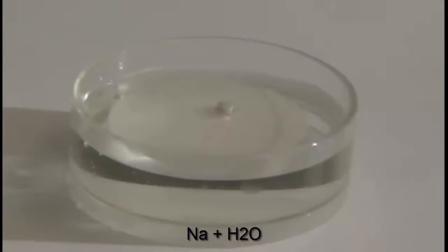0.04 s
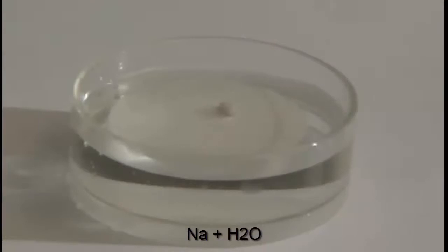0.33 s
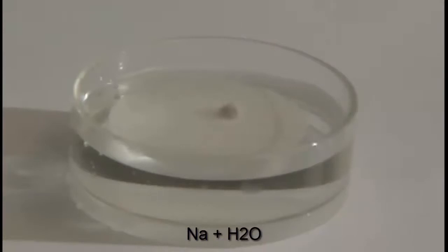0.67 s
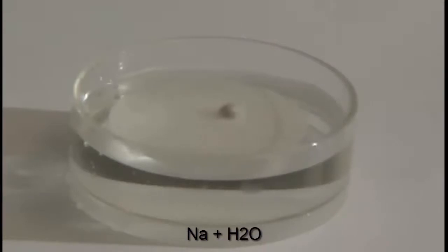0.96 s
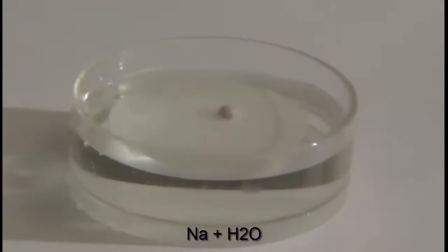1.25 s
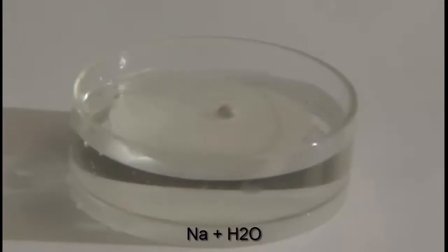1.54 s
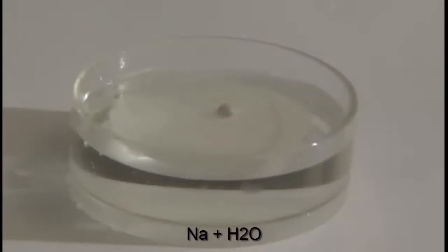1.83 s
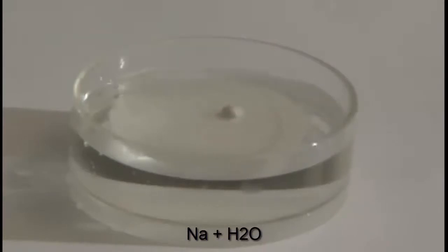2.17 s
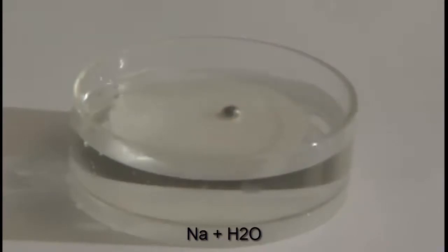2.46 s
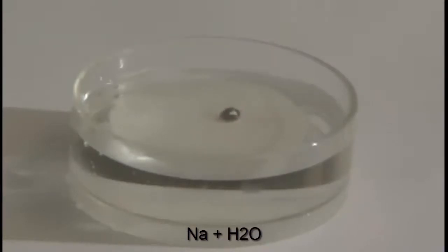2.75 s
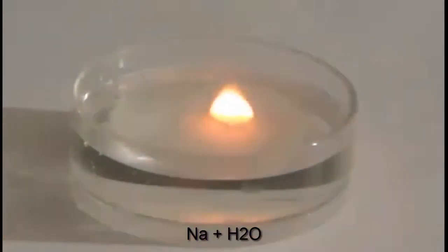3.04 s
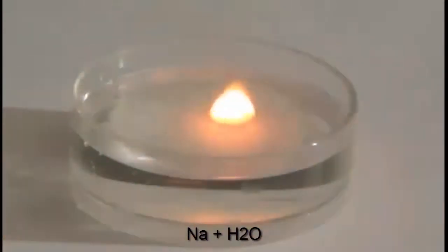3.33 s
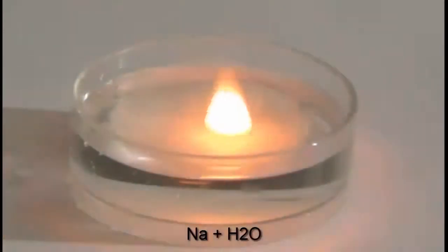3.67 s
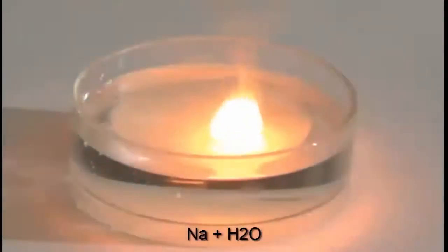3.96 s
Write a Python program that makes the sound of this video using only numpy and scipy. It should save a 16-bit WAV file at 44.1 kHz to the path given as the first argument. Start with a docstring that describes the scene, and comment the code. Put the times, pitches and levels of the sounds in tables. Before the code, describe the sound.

A bead of sodium fizzes faintly on water over low ventilation noise, with a soft, dull bump at about 0.3 seconds. From about 1.2 seconds the fizz grows into a sputtering, bubbly hiss. At 2.9 seconds it ignites with one sharp pop, far louder than the rest, echoing briefly in a hard-walled room. A quiet sizzle follows and swells from about 3.7 seconds to the end.

```python
"""A bead of sodium fizzes on water in a glass dish as countless tiny hydrogen bubbles burst.
Their impulses merge into shot noise, while larger bubbles ring as damped oscillators. The gas ignites
with one sharp pop, a short pulse that excites the echoes, reverberation and normal modes of a
hard-walled room. The bead then burns with a quieter sizzle that flares up at the end.
Faint ventilation and hum lie underneath, with a few dull bumps near the start."""
import sys
import numpy as np
from scipy import signal
from scipy.fft import rfft, irfft
from scipy.io import wavfile
from scipy.ndimage import uniform_filter1d

SR = 44100
rng = np.random.default_rng(int(sys.argv[2]) if len(sys.argv) > 2 else 0)


def generate_wav(sig):
    """Save sig (samples, or channels by samples) to the path in sys.argv[1] as 16-bit PCM at SR."""
    pcm = np.round(np.clip(np.atleast_2d(sig).T, -1, 1) * 32767).astype(np.int16)
    wavfile.write(sys.argv[1], SR, pcm)


N = 176400
TIME = np.arange(N) / SR
BIN_HZ = np.maximum(np.fft.rfftfreq(N, 1 / SR), 1)
IGNITION_S, REVERB_BUILD_S = 2.9193, 0.0023


def undb(db):
    """Amplitude ratio of a level in decibels."""
    return 10 ** (np.asarray(db) / 20)

def unit(x):
    """Normalisation to rms 1."""
    return x / np.sqrt(np.mean(x ** 2))

def curve(rows, column=1):
    """Linear interpolation of a table column in time."""
    rows = np.array(rows)
    return np.interp(TIME, rows[:, 0], rows[:, column])

def since(start):
    """Seconds elapsed since an onset, zero before it."""
    return np.maximum(TIME - start, 0)

def over_hz(points, hz):
    """Interpolation on a logarithmic frequency axis."""
    points = np.array(points)
    return np.interp(np.log(hz), np.log(points[:, 0]), points[:, 1])

def colour(x, spectrum):
    """Spectral shaping, normalised to rms 1."""
    return unit(irfft(rfft(x) * undb(over_hz(spectrum, BIN_HZ)), N))

def above(x, hz):
    """Zero-phase high-pass filtering."""
    return irfft(rfft(x) / (1 + (hz / BIN_HZ) ** 10), N)

def walk(rate):
    """Moving averages turn white noise into a slow fluctuation of rms 1."""
    width = int(SR / rate)
    return unit(uniform_filter1d(uniform_filter1d(rng.standard_normal(N), width), width))

def decay(t, t60):
    """Exponential decay by 60 dB in t60 seconds."""
    return 1000. ** (-t / t60)

def in_room(x):
    """Convolution with decaying noise adds a diffuse field as strong as the direct sound."""
    response = rng.standard_normal(N) * decay(TIME, t60=0.58) * (1 - np.exp(-TIME / REVERB_BUILD_S))
    diffuse = irfft(rfft(x) * rfft(response), N)
    return unit(unit(x) + unit(diffuse))

def large_bubbles(count=1600, per_s=420, median_hz=2202, spread_db=6.5, size=1200):
    """Damped oscillation: each larger bubble rings briefly at its own pitch as it bursts."""
    out, t = np.zeros(N + size), TIME[:size]
    starts = np.cumsum(rng.exponential(1, count)) / per_s
    for start, (pitch, strength) in zip(starts, rng.standard_normal((count, 2))):
        i, hz = int(start * SR), median_hz * 2 ** (0.258 * pitch)
        if i < N:
            ring = np.sin(2 * np.pi * hz * t) * decay(t, t60=34 / hz)
            out[i:i + size] += undb(spread_db * min(strength, 2)) * ring
    return unit(above(out[:N], hz=500))

def bubble_shower(spectrum, per_s=9000, spread_db=6.5, sputter_db=1.1):
    """Shot noise: bursts of very unequal size merge into a sputtering hiss, and a few of them ring."""
    bursts = rng.random(N) < per_s / SR
    sizes = undb(spread_db * np.minimum(rng.standard_normal(N), 2.6)) * rng.choice([-1, 1], N)
    shower = colour(bursts * sizes, spectrum) + undb(-18.5) * large_bubbles()
    return in_room(shower * undb(sputter_db * walk(rate=55)))

# Relative spectral density of the fizz: f/Hz, level/dB
FIZZ_SPECTRUM = [(40, -62), (110, -40), (250, -19), (450, -8), (650, -9), (900, -4.5), (1250, -4.5),
                 (1600, 0.5), (1950, -3), (2400, -0.5), (3000, -2.5), (3600, -5), (4300, -8), (4600, 0),
                 (5250, -0.5), (5700, -5), (6450, -3.5), (7500, -10.5), (8500, -9.5), (9800, -12.5)]
# Strength of the reaction: t/s, relative fizz level/dB, relative treble level/dB
REACTION = [(0.0, -53.5, -7), (0.34, -56, -5.5), (0.51, -52.5, -4), (0.53, -54, -5), (0.73, -52.5, -5.5),
            (0.85, -57, -2), (0.89, -55, -1.5), (1.21, -44.5, -6.5), (1.72, -40, -7), (2.04, -40.5, -8.5),
            (2.18, -41.5, -7.5), (2.25, -44, -12.5), (2.3, -40.5, -7.5), (2.62, -45, -7), (2.81, -39.5, -8),
            (2.89, -45, -10)]
# Gain of the fizz's lower band: t/s, level/dB
FIZZ_LOW_GAIN = [(.3, 7), (.85, -10), (1.17, -8.5), (1.45, 2.5), (1.75, -3), (2.15, 2.5), (2.6, -4),
                 (2.85, -3)]
# Surge of large ringing bubbles: t/s, level/dB
BUBBLE_SURGE = [(1.1, -64), (1.5, -53.5), (2.05, -46), (2.3, -56), (2.88, -56)]

def fizzing():
    """Amplitude modulation: the shower swells and shifts its balance with the reaction."""
    shower = bubble_shower(FIZZ_SPECTRUM)
    treble = above(shower, hz=6670)
    lows = shower - above(shower, hz=1000)
    shower = shower + treble * (undb(curve(REACTION, column=2) + 11.5) - 1)
    shower = shower + lows * (undb(curve(FIZZ_LOW_GAIN)) - 1)
    surge = in_room(large_bubbles()) * undb(curve(BUBBLE_SURGE))
    return shower * undb(curve(REACTION) + 2.5) + surge

# Relative spectral density of moving air: f/Hz, level/dB
AIR_SPECTRUM = [(30, -39), (70, -32), (150, -23), (300, -10.5), (550, -3), (1000, -0.5), (1450, 1),
                (2000, -13.5), (5000, -10), (9800, -25)]
# Partials of the hum: f/Hz, rms level/dB
HUM_PARTIALS = [(91.5, -91), (188.4, -80), (279.9, -79.5)]

def ventilation(air_db=-56.5):
    """Superposition of broadband air noise and the line spectrum of a low hum."""
    air = colour(rng.standard_normal(N), AIR_SPECTRUM) * undb(air_db + .5 * walk(rate=18))
    hum = sum(undb(db) * np.sqrt(2) * np.sin(2 * np.pi * hz * TIME) for hz, db in HUM_PARTIALS)
    return air + hum

# Distant bumps: onset t/s, level/dB, centre f/Hz
DULL_BUMPS = [(.268, -47.5, 456), (.36, -74, 145), (.37, -61, 524)]

def bumps(width_octaves=0.49, rise_s=0.017):
    """Reverberation blurs each distant bump into a decaying band of noise."""
    out = 0
    for start, db, hz in DULL_BUMPS:
        t = since(start)
        band = np.exp(-(np.log2(BIN_HZ / hz) / width_octaves) ** 2 / 2)
        body = unit(irfft(rfft(rng.standard_normal(N)) * band, N))
        out = out + undb(db) * body * (1 - np.exp(-t / rise_s)) * decay(t, t60=0.39)
    return out

# Relative spectral density of the ignition crack: f/Hz, level/dB
CRACK_SPECTRUM = [(60, -40), (500, -5), (1200, -1), (2400, 10), (3100, -5), (3600, -14), (4700, 7),
                  (5800, -10.5), (7000, -11.5), (9800, -18)]

def pop_pulse(at, hz, crack_db, crack_s=0.00075):
    """The sharp pop is a transient: a short pulse, a peak between two troughs, with a thin crack."""
    t = TIME - at
    u = (np.pi * hz * t) ** 2
    pulse = (1 - 2 * u) * np.exp(-u)
    crack = colour(rng.standard_normal(N), CRACK_SPECTRUM) * np.exp(-abs(t) / crack_s)
    return undb(-2.5) * pulse + undb(crack_db) * crack

# Early reflections of the pop: delay t/s, relative level/dB, centre f/Hz
REFLECTIONS = [(.0037, -7, 744), (.0133, -18, 1400), (.0207, -8, 1420), (.0268, -22, 1490),
               (.0372, -10, 1500), (.0585, -19, 1400)]

def pop():
    """Reflection: hard walls return delayed copies of the direct pulse, with far less crack."""
    echoes = sum(undb(db) * pop_pulse(IGNITION_S + delay, hz, crack_db=-33.5)
                 for delay, db, hz in REFLECTIONS)
    return pop_pulse(IGNITION_S, hz=640, crack_db=-10.5) + echoes

# Relative spectral density of the pop's diffuse field: f/Hz, level/dB
REVERB_SPECTRUM = [(40, -41), (110, -37), (150, -18.5), (260, -5.5), (340, -3), (520, 3.5), (700, -3),
                   (1150, -2.5), (1750, 1), (2020, -11), (2400, -5.5), (2700, -19.5), (3150, -12),
                   (3450, -40), (3950, -29.5), (4500, -13.5), (5300, -19.5), (5600, -26), (6900, -33),
                   (7600, -40), (9800, -53)]
# Reverberation time: f/Hz, T60/s
REVERB_TIMES = [(150, 0.65), (500, 0.67), (1500, 0.57), (4000, 0.73), (9000, 0.35)]

def reverberation(hold_s=0.055):
    """The pop's diffuse field builds up, holds, then decays at a separate rate in each octave."""
    spectrum = rfft(colour(rng.standard_normal(N), REVERB_SPECTRUM))
    out = 0
    for octave in range(5, 15):
        band = irfft(spectrum * np.maximum(1 - abs(np.log2(BIN_HZ) - octave), 0), N)
        out = out + band * decay(since(IGNITION_S + hold_s), over_hz(REVERB_TIMES, 2. ** octave))
    return undb(-22) * out * (1 - np.exp(-since(IGNITION_S) / REVERB_BUILD_S))

# Resonances of the room: f/Hz, level/dB, T60/s
NORMAL_MODES = [(143, -49, 0.72), (218, -37, .35), (268, -38, 0.25), (337.5, -25.5, 0.46), (413, -31, 0.29),
                (441.5, -14, 0.21), (467.6, -22.5, 0.58), (574, -28.5, 0.49), (788, -33.5, 0.48),
                (864, -30, 0.31), (938, -25.5, 0.51), (1110, -29, 0.6), (1685, -33, 0.63),
                (1784, -29.5, 0.44)]

def room_modes(build_s=0.0094):
    """Resonance: the room's normal modes, excited by the pop, ring as damped sinusoids."""
    t = since(IGNITION_S)
    ring = sum(undb(db) * np.sin(2 * np.pi * (hz * t + rng.random())) * decay(t, t60)
               for hz, db, t60 in NORMAL_MODES)
    return ring * (1 - np.exp(-t / build_s))

# Relative spectral density of the sizzle: f/Hz, level/dB
SIZZLE_SPECTRUM = [(40, -52), (110, -33), (250, -23), (450, -11), (1150, -5), (1600, 1), (2000, -2.5),
                   (2400, 0), (3200, -5.5), (4200, -9), (4800, -1), (5400, -1.5), (6100, -5), (6950, -2),
                   (7600, -6.5), (9800, -10)]
# Sizzle of the burning bead: t/s, relative level/dB
SIZZLE_LEVEL = [(3.28, -49), (3.29, -46.5), (3.544, -46), (3.662, -47.5), (3.814, -43), (3.862, -39),
                (3.98, -35.5)]

def burning(notch_start_hz=7940, fall_hz_per_s=2020, flare_hz=3920):
    """Time-varying filtering: a notch glides down the sizzle, and the flare fills in the upper mids."""
    level_db = curve(SIZZLE_LEVEL)
    hz, t, frames = signal.stft(bubble_shower(SIZZLE_SPECTRUM), SR, nperseg=512)
    notch_hz = notch_start_hz - fall_hz_per_s * (t - IGNITION_S)
    notch_db = -7 * np.exp(-((hz[:, None] - notch_hz) / 470) ** 2)
    rise_db = np.interp(t, TIME, level_db - level_db[0])
    flare_db = 0.58 * rise_db * np.exp(-((hz[:, None] - flare_hz) / 820) ** 2)
    _, sizzle = signal.istft(frames * undb(notch_db + flare_db), SR, nperseg=512)
    return sizzle[:N] * undb(level_db + 1)

def scene():
    """Superposition at one point, the same in both ears; fizz gives way to sizzle at ignition."""
    sodium = np.where(TIME > IGNITION_S, burning(), fizzing())
    mono = sodium + pop() + reverberation() + room_modes() + bumps() + ventilation()
    return np.array([mono, mono])

def record(dry, cutoff_hz=9750):
    """Hard clipping at full scale, followed by a steep low-pass filter."""
    low_pass = np.clip((cutoff_hz - BIN_HZ) / 150 + .5, 0, 1)
    return irfft(rfft(np.clip(dry, -1, 1)) * low_pass, N)


dry = scene()
out = record(dry)
generate_wav(out)
```